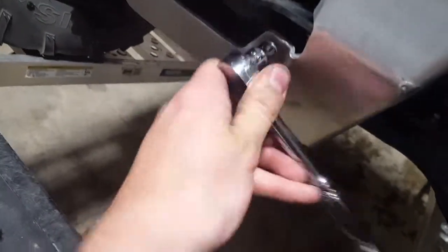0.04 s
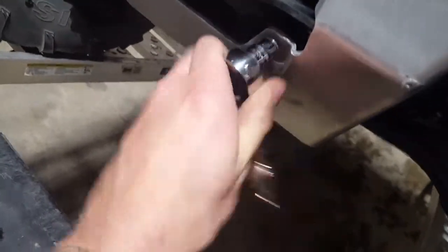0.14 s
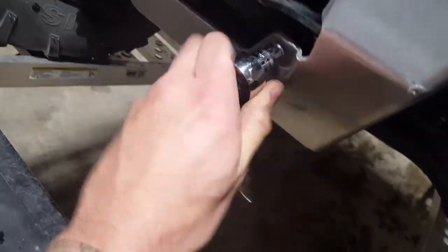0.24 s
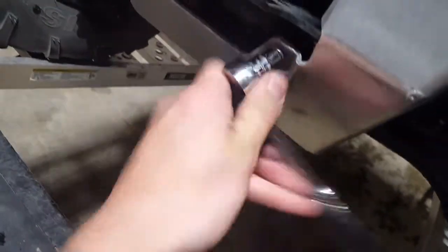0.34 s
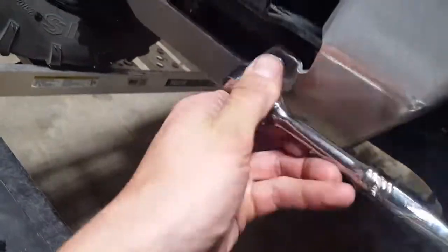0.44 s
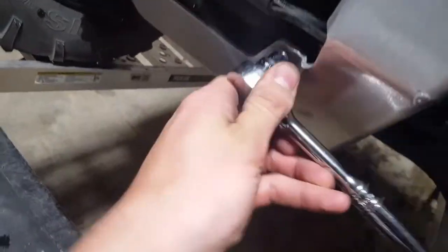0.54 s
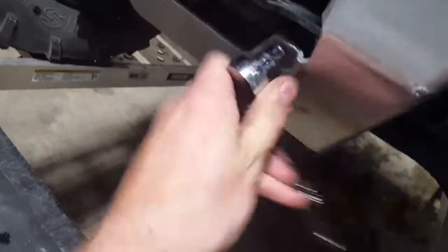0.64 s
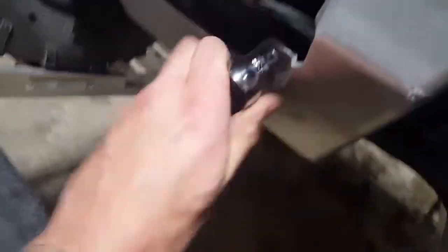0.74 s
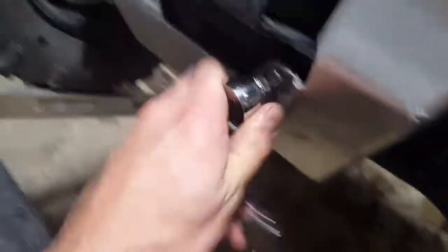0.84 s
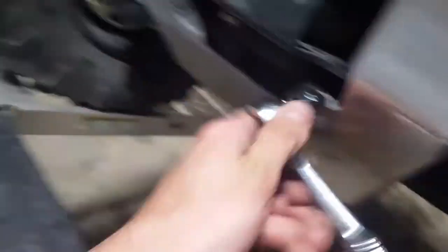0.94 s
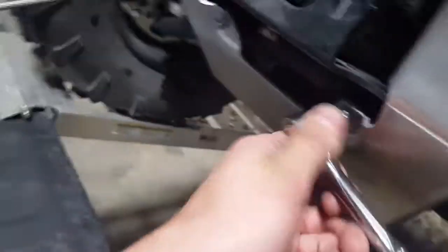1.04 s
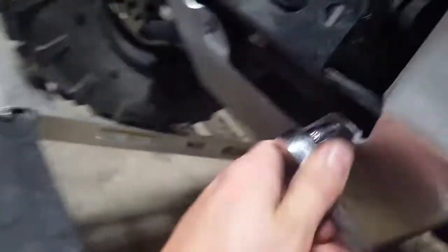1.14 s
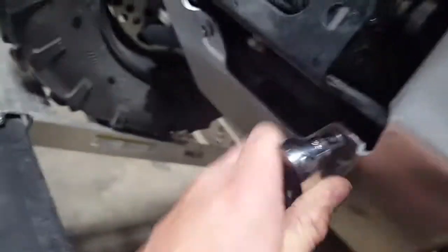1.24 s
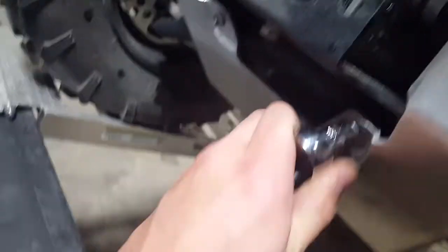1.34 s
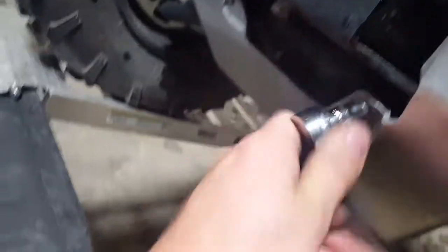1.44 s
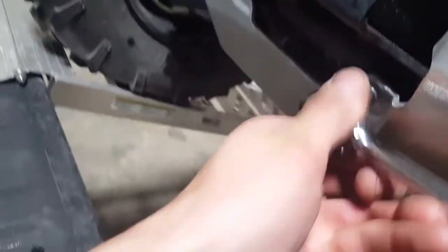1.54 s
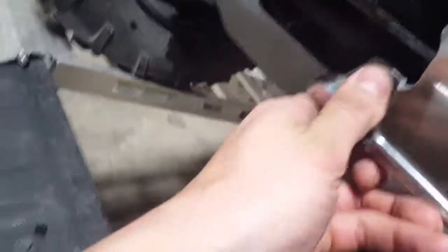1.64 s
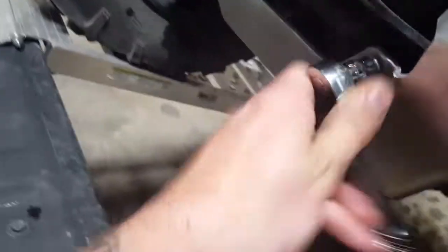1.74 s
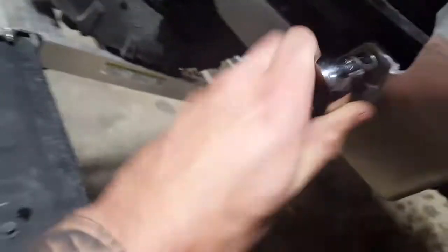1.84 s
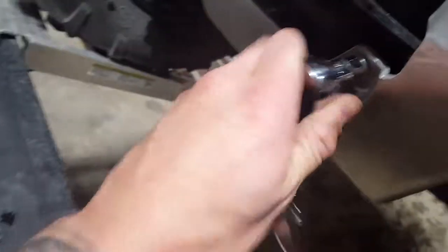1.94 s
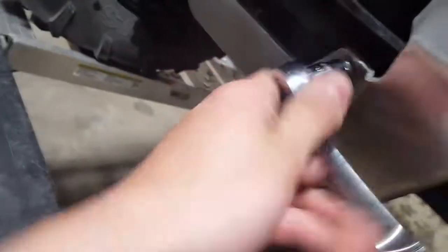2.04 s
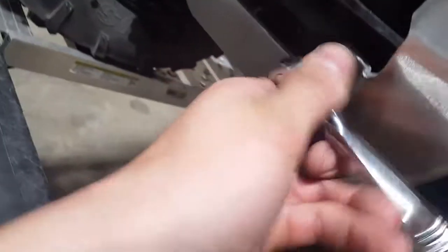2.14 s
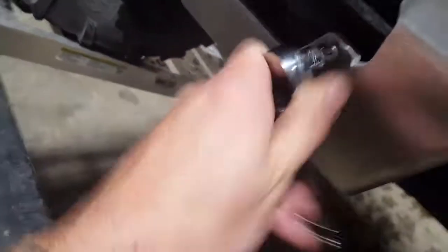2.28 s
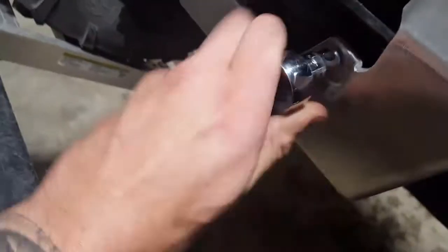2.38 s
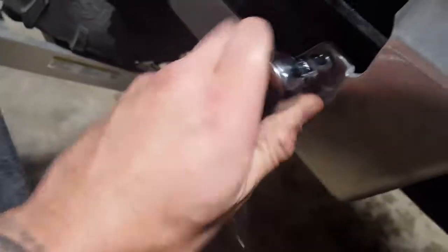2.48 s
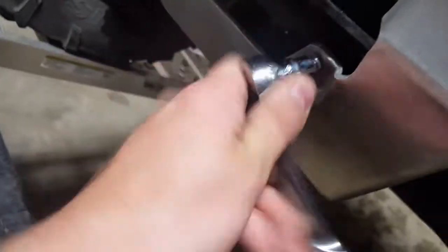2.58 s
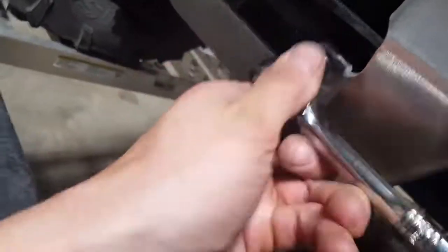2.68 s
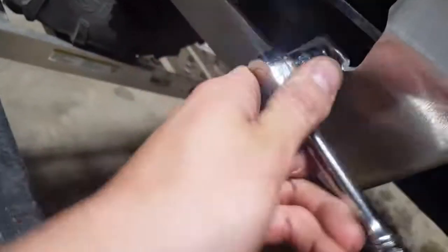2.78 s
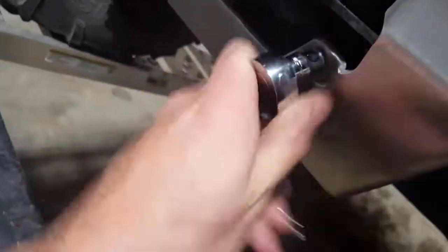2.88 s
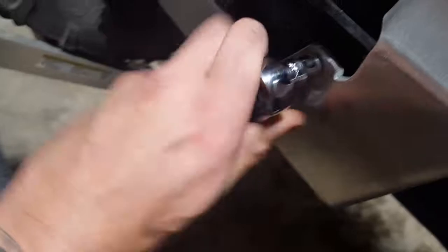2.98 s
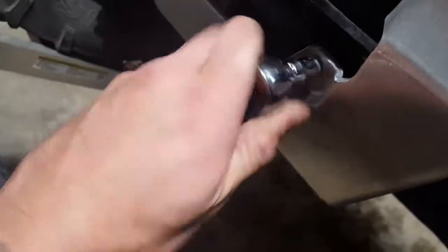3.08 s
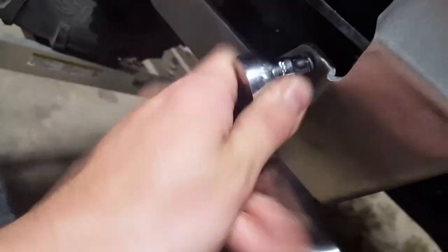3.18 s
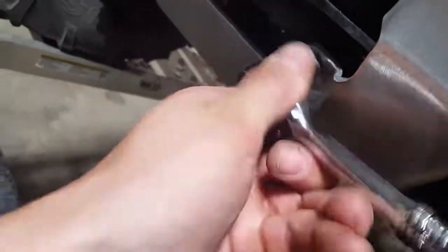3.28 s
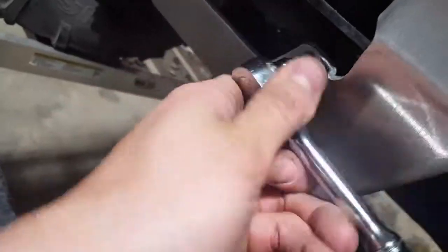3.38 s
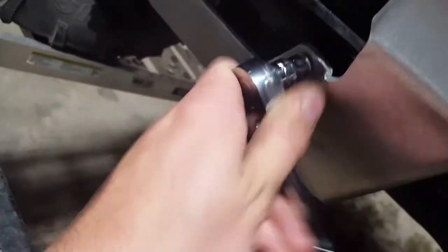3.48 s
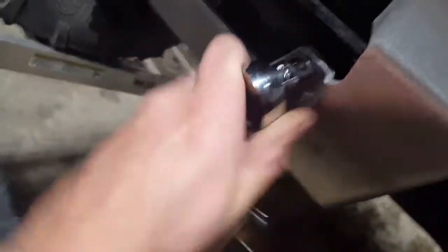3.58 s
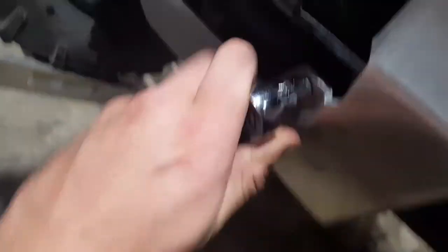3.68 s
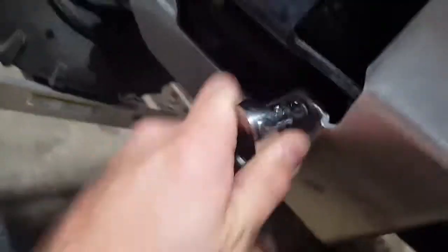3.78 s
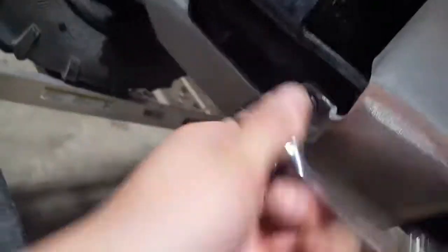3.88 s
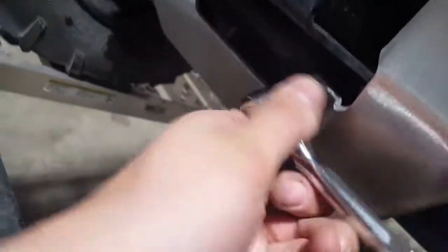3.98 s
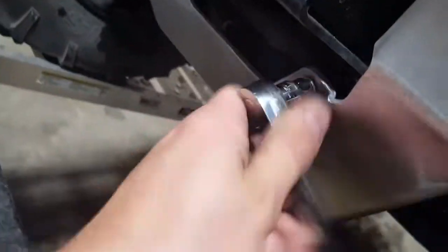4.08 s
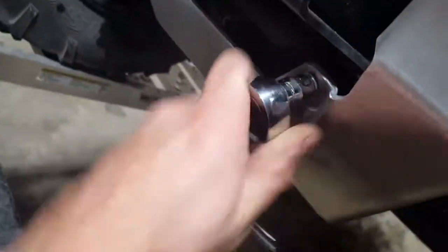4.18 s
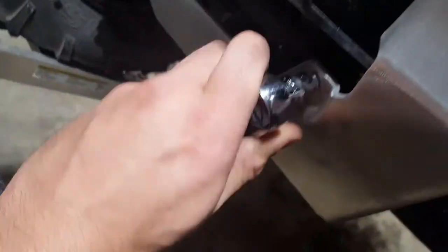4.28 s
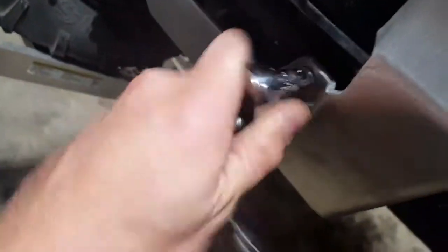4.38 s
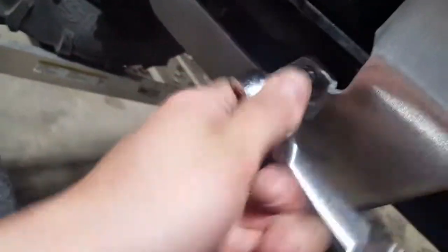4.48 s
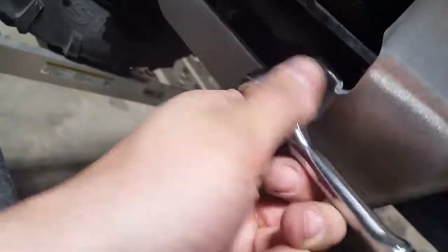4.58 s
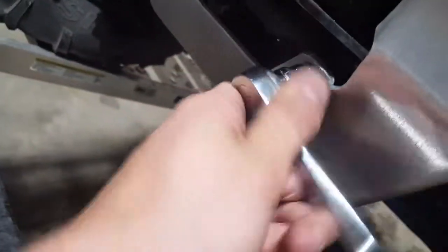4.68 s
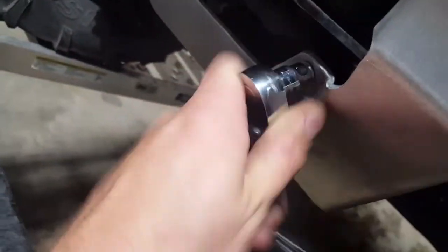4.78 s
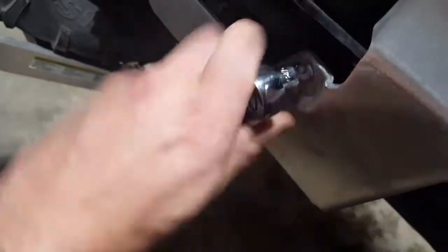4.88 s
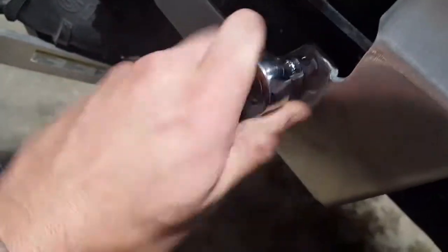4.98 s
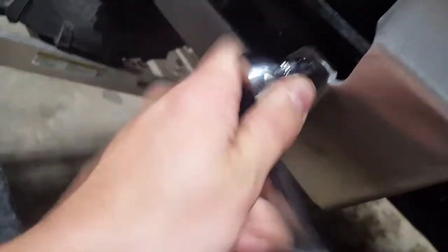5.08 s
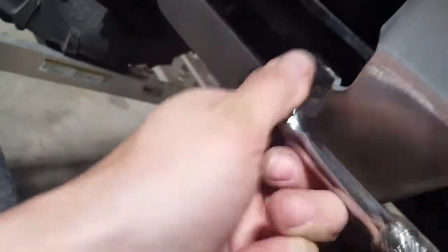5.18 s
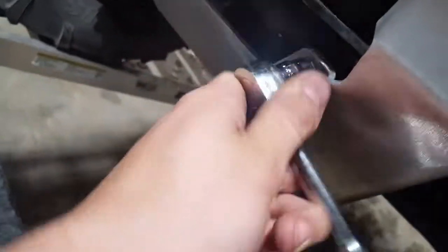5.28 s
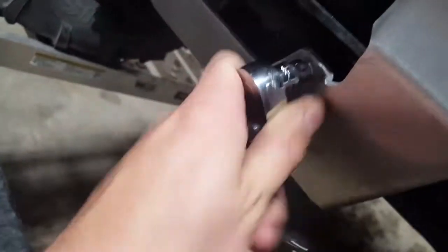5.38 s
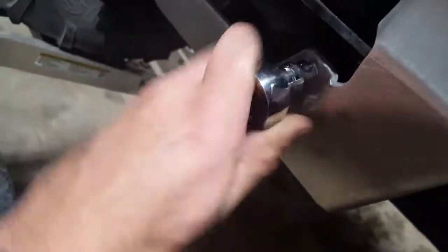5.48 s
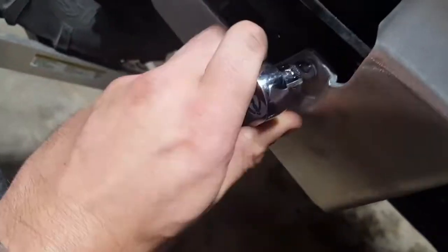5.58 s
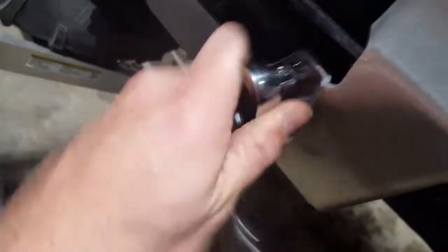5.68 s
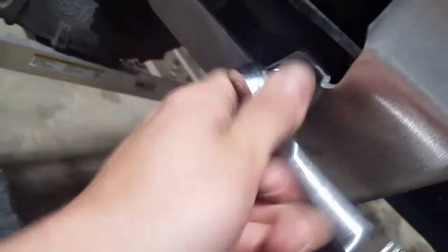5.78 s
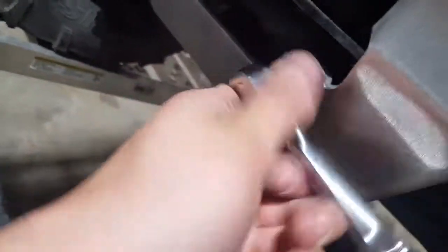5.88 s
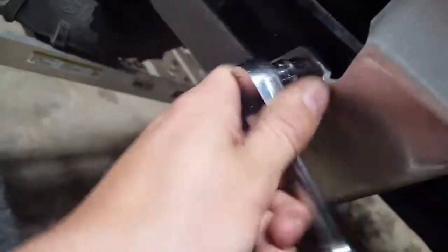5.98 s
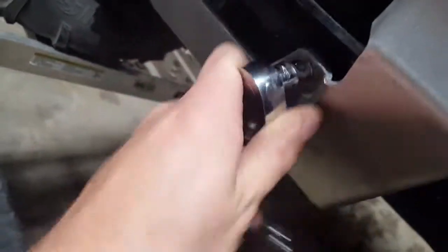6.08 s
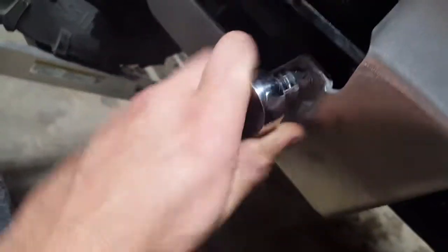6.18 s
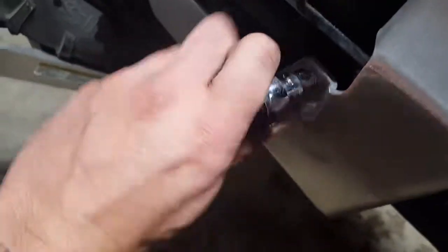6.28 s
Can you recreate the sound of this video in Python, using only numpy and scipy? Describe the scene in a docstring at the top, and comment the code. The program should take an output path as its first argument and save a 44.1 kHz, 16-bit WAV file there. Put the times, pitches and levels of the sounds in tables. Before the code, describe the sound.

A socket ratchet tightens a bolt on a steel plate under a vehicle. Each back swing gives a quick zip of bright metallic clicks, followed by a clunk as the socket seats and booms faintly in the chassis. The pattern repeats steadily, nearly twice a second, with an occasional soft rub of a hand on the handle. The microphone is close, with light garage reverberation and a faint drone behind.

```python
"""A quick metallic zip, then a clunk, over and over: a socket ratchet tightens a bolt under a vehicle.
On each back swing the pawl drops over the teeth, speeding up and slowing again; every impact rattles
the tool and excites the modes of a steel plate. The socket then takes up its slack with a clunk that
booms faintly in the chassis, and now and then the hand rubs along the handle. The microphones are
close; behind the tool lie the garage's reverberation, its steady noise and a faint drone."""
import sys
import numpy as np
from scipy import signal
from scipy.fft import rfft, irfft
from scipy.io import wavfile
from scipy.ndimage import uniform_filter1d

SR = 44100
rng = np.random.default_rng(int(sys.argv[2]) if len(sys.argv) > 2 else 0)


def digitize_waveform(pressure):
    """Quantize a signal to 16-bit integers and store it at the path in sys.argv[1].

    Rows of a 2-D input are taken as channels; values are limited to [-1, 1].
    """
    field = np.atleast_2d(pressure).T
    bounded = np.clip(field, -1, 1)
    quanta = np.round(bounded * 32767).astype(np.int16)
    wavfile.write(sys.argv[1], SR, quanta)


N = 279153


def amp(db):
    """Decibels to amplitude ratio."""
    return 10 ** (np.asarray(db) / 20)


def unit(x):
    """Normalisation to rms 1."""
    return x / np.sqrt(np.mean(x ** 2) + 1e-20)


def read(table, hz, column=1):
    """Interpolation of a table column on a log-frequency axis."""
    table = np.array(table)
    return np.interp(np.log(hz + 1), np.log(table[:, 0] + 1), table[:, column])


def add(mix, start_s, sound):
    """Superposition: a sound sums into the mix from start_s on."""
    part = mix[..., max(round(start_s * SR), 0):][..., :sound.shape[-1]]
    part += sound[..., :part.shape[-1]]


def bump(hz, centre_hz, width_hz):
    """Lorentzian resonance curve, 1 at its centre."""
    return 1 / (1 + (2 * (hz - centre_hz) / width_hz) ** 2)


def shelf(hz, edge_hz, order):
    """High-pass curve, from 0 below the edge to 1 above it."""
    return 1 - 1 / (1 + (hz / edge_hz) ** order)


def colour(x, gain_db, size=4096):
    """Minimum-phase filter whose gain in dB is a function of frequency."""
    hz = abs(np.fft.fftfreq(size, 1 / SR))
    log_response = np.conj(signal.hilbert(np.log(amp(gain_db(hz)))))
    taps = np.fft.ifft(np.exp(log_response)).real
    return signal.fftconvolve(x, taps[None], axes=1)[:, :x.shape[1]]


# likeness of the sound at the two microphones: frequency_hz, correlation
COHERENCE = [(30, 0.15), (100, 0.97), (600, 0.73), (1000, 0.1), (1800, 0.026), (14000, .02)]


def pair(noises):
    """Spatial coherence: two close microphones receive much the same bass but unrelated treble."""
    own, right = rfft(noises)
    same = read(COHERENCE, np.fft.rfftfreq(noises.shape[-1], 1 / SR))
    left = same * right + np.sqrt(1 - same ** 2) * own
    return irfft(np.array([left, right]), noises.shape[-1])


def scatter(size=2048):
    """Dense reflections: an even spectrum with random phases, in stereo."""
    phases = 2 * np.pi * rng.random((2, size // 2 + 1))
    return unit(pair(irfft(np.exp(1j * phases))))


def strike(pattern, db, treble_db, rise_ms, hold_ms, fade_ms, linger=0.17, linger_ms=14, cut_below_db=-2):
    """Impact: a metallic click rises, holds and fades; quieter clicks have their highest treble cut."""
    ms = np.arange(pattern.shape[-1]) / SR * 1000
    decay = np.exp(-np.maximum(ms - hold_ms, 0) / fade_ms) + linger * np.exp(-ms / linger_ms)
    envelope = (1 - np.exp(-ms / rise_ms)) * decay
    impulse = signal.unit_impulse(len(ms), np.searchsorted(ms, rise_ms))
    rattle = pattern * envelope / np.linalg.norm(envelope)
    hit = np.vstack([rattle, impulse])  # rows: left, right, and the blow that rings the modes
    top_db = np.clip(db + treble_db - cut_below_db, -18, 2)
    return colour(hit, lambda hz: treble_db * shelf(hz, edge_hz=3320, order=4)
                  + top_db * shelf(hz, edge_hz=9650, order=24) + db, size=256)


def contact_drift(spread_db, memory, teeth=36, bands=20):
    """Correlated drift: band gains in dB wander from tooth to tooth as the contact point moves."""
    steps = rng.standard_normal((teeth, bands))
    return spread_db * unit(signal.lfilter([1], [1, -memory], steps, axis=0))


# back swings of the handle; swell and brighten are changes over the swing, levels are relative:
# start_s, end_s, first_rate_hz, top_rate_hz, last_rate_hz, fastest_fraction, level_db, swell_db,
# treble_db, brighten_db, pawl_zing_hz, pawl_zing_db, plate_knock_db, socket_clank_db
BACK_SWINGS = [(.002, 0.058, 79, 115, 68, 0.45, -25.5, -1.5, -7, -7, 4500, -1, -5.5, -0.5),
               (0.427, 0.571, 88, 160, 79, 0.52, -27.5, -1, 0, 0.5, 4550, 3.5, -3.5, 4),
               (0.969, 1.13, 92.6, 146, 105, .32, -27, 0, -1.5, -1.5, 4800, 1.5, 0, 0),
               (1.535, 1.674, 88.5, 188, 92, 0.7, -22.5, -1, -0.5, -3, 6500, 1.5, -0.5, -1),
               (2.104, 2.237, 126, 142.6, 129, 0.47, -25, -1.5, 1.5, 2.5, 5300, -3.5, 1, 2),
               (2.635, 2.802, 110.5, 137, 81, 0.61, -24, -5.5, -2.5, 4, 6700, -1.5, -1.5, 2),
               (3.232, 3.411, 107, 167, 92, 0.62, -25.5, 1, -1, 7.5, 6230, 2.5, 1, 3),
               (3.878, 4.063, 73, 189, 82, 0.5, -23, -4.5, -3, 0.5, 6620, 6.5, -1.5, -0.5),
               (4.492, 4.66, 119, 174, 96, 0.73, -25, 0.5, .5, 5, 6600, 2, 2, 3.5),
               (5.115, 5.305, 100, 159, 101, .8, -23, 4.5, -1, -4.5, 6700, -1, 3.5, -0.5),
               (5.792, 5.956, 105.5, 177, 91, 0.75, -26, -2, 2, -0.5, 6400, 5.5, 5, -3)]


def pawl(alike=0.71, uneven_db=1.7, jitter_s=0.00012, ease_s=0.031, ease_db=-2):
    """Impact train: the pawl drops off tooth after tooth, brighter the faster it runs."""
    out = np.zeros((3, N))
    for start, end, first_hz, top_hz, last_hz, fastest, *tone in BACK_SWINGS:
        level_db, swell_db, treble_db, brighten_db, zing_hz, zing_db, knock_db, clank_db = tone
        t = np.arange(start, end, 1 / SR)
        progress = (t - start) / (end - start)
        rate_hz = np.interp(progress, [0, fastest, 1], [first_hz, top_hz, last_hz])
        teeth = np.flatnonzero(np.diff(np.floor(np.cumsum(rate_hz) / SR), prepend=-1))
        octaves = np.log2(rate_hz / rate_hz.mean())
        lean = progress - 0.5  # the hand's pressure shifts steadily
        easing = np.maximum(1 - (end - t) / ease_s, 0)  # and lets up at the end
        power_db = level_db + swell_db * lean + ease_db * easing
        energy_db = power_db + 10 * np.log10(SR / rate_hz)  # faster teeth each carry less
        bright_db = treble_db + brighten_db * lean + 3.5 * octaves
        bright_db[0] += 0.5  # the first tooth
        tints = contact_drift(spread_db=5, memory=0.88)
        bands_hz = np.linspace(0, 12000, tints.shape[1])
        fresh_patterns = [scatter() for _ in tints]
        chance = rng.standard_normal((len(tints), 2))
        pattern, run = scatter(), np.zeros((3, SR // 3))
        for i, fresh, (force, late), tint_db in zip(teeth, fresh_patterns, chance, tints):
            pattern = np.sqrt(alike) * pattern + np.sqrt(1 - alike) * fresh  # resembles the last click
            hit = strike(pattern, energy_db[i] + uneven_db * force, bright_db[i],
                         rise_ms=1.5, hold_ms=3.4, fade_ms=6.06, linger=0.13)
            ping_db = zing_db + 4 * octaves[i]
            rock_db = -0.07 * bright_db[i]  # a tooth that lands dull rocks the socket instead
            hit = colour(hit, lambda hz: np.interp(hz, bands_hz, tint_db) * shelf(hz, 746, order=4)
                         + ping_db * bump(hz, zing_hz, 1440) + rock_db * bump(hz, 1300, 600), size=256)
            add(run, i / SR + jitter_s * late, hit)
        run = colour(run, lambda hz: knock_db * bump(hz, 825, 330)
                     + clank_db * bump(hz, 1380, 640), size=1024)
        add(out, start, run)
    return out


# resonances of plate and tool: frequency_hz, bandwidth_hz, left_gain_db, right_gain_db, left_lead_rad
STEEL_MODES = [(484, 28, 6, 6, -.6), (613, 45, -6, 10, -.7), (815, 50, 7, 6, -.1), (880, 45, 6, 16, -.9),
               (1022, 45, 6, 10, .1), (1240, 40, -3, 7, 3), (1345, 55, 4, 16, .9), (1385, 40, 12, 8, 1.1),
               (1470, 50, -1, 9, -1.5), (1605, 58, 3, 14, .1), (1787, 40, 9, 18, 2.8), (2240, 54, 6, 1, .3),
               (2319, 24, 0, 7, -.6), (2530, 45, 3, 3, .1), (2675, 22, 5, 5, -1.5),
               (3122, 45, 14, 11, -1.3), (3567, 54, 9, -4, 2.1), (4120, 50, -3, 7, -2.9),
               (5620, 65, -1, 9, 3), (5784, 27, -6, 7, 1.1), (6345, 40, -6, 7, -1.2),
               (6448, 80, -6, 11, -3)]
# spectrum of the dense rattle between the modes: frequency_hz, left_gain_db, right_gain_db
RATTLE_SPECTRUM = [(56, -15, -15.5), (235, -7.5, -4), (523, -3, 2.5), (814, 7, 11), (1044, -13, 5.5),
                   (1360, -4.5, 11.5), (1860, 5.5, 7.5), (3640, 2, -1.5), (4160, 2, 9.5), (5300, -2, 7),
                   (6170, -3, 7.5), (8310, -7, 4), (9610, -17.5, -13), (14800, -24.5, -16.5)]


def steel(hits, ring_db, rattle_db):
    """Modal radiation: plate and tool answer each impact with damped sinusoids and a dense rattle."""
    t, ring = np.arange(SR // 4) / SR, 0
    for k, (mode_hz, width_hz, left_db, right_db, lead_rad) in enumerate(STEEL_MODES):
        decay = 2 * np.pi * width_hz / SR * np.exp(-np.pi * width_hz * t)
        phase = 2 * np.pi * mode_hz * t
        mode = np.array([amp(left_db) * np.sin(phase + lead_rad), amp(right_db) * np.sin(phase)])
        ring = ring + (-1) ** k * decay * mode
    bass_cut = signal.butter(2, 330, "high", fs=SR, output="sos")  # a small plate radiates little bass
    ringing = signal.oaconvolve(hits[2:], signal.sosfilt(bass_cut, ring), axes=1)[:, :N]
    left = colour(hits[:1], lambda hz: read(RATTLE_SPECTRUM, hz, column=1))
    right = colour(hits[1:2], lambda hz: read(RATTLE_SPECTRUM, hz, column=2))
    return amp(rattle_db) * np.vstack([left, right]) + amp(ring_db) * ringing


# reverberation of the garage: frequency_hz, t60_s, gain_db
GARAGE_DECAY = [(120, 0.97, 3), (403, 0.38, -7), (1000, 0.9, -11.5), (2860, 0.98, -12), (7400, 0.89, -23.5),
                (11700, 0.088, -20)]


def garage(x, build_s=0.0013):
    """Reverberation: a diffuse field decays exponentially, each band at its own rate."""
    hz, t, noise = signal.stft(pair(rng.standard_normal((2, SR))), SR, nperseg=256)
    decay = amp(-60 * t / read(GARAGE_DECAY, hz)[:, None]) * (1 - np.exp(-t / build_s))
    energy = SR * np.mean(decay ** 2, axis=1, keepdims=True)
    decay *= amp(read(GARAGE_DECAY, hz, column=2))[:, None] / np.sqrt(energy)
    response = signal.istft(noise * decay, SR, nperseg=256)[1]
    return signal.fftconvolve(x, response, axes=1)[:, :N]


def band_noise(low_hz, high_hz):
    """Band-limited stereo noise of rms 1."""
    band = signal.butter(2, [low_hz, high_hz], "band", fs=SR, output="sos")
    return unit(signal.sosfilt(band, pair(rng.standard_normal((2, N)))))


# spectrum of the garage's steady noise: frequency_hz, relative_density_db
AMBIENT_SPECTRUM = [(15, -37), (25, -5.5), (392, -5), (940, -9.5), (1100, -8), (1820, -8.5), (1970, -41),
                    (2570, -10.5), (2780, -35), (3530, -17.5), (14000, -52)]


def background(air_db=-50.5, drone_db=-58, waver_db=5.5, waver_s=0.345):
    """Ambient noise: a steady broadband floor and a narrow-band drone whose level wavers."""
    spectrum = amp(read(AMBIENT_SPECTRUM, np.fft.rfftfreq(N, 1 / SR)))
    air = irfft(rfft(pair(rng.standard_normal((2, N)))) * spectrum, N)
    steps = rng.uniform(-1, 1, size=64)
    waver = np.interp(np.arange(N) / SR / waver_s, np.arange(len(steps)), steps)
    drone = amp(drone_db + waver_db * waver) * band_noise(low_hz=358, high_hz=394)
    return amp(air_db) * unit(air) + drone


# stray teeth, and the tool rocking on the bolt or shifting in the hand: start_s, relative_db, treble_db
LOOSE_CONTACTS = [(.099, -15, -20), (.123, -20, -9), (.384, -25.5, -23), (.492, -6, -6), (.562, -7.5, -25),
                  (.723, -39, 10), (1.066, -4.5, -28), (1.473, -14.5, -24), (1.5, -17, -17),
                  (1.706, -10.5, -8.5), (2.596, -29.5, -8), (3.275, -9, -24), (3.468, -16.5, -32),
                  (3.489, -26, -20), (3.852, -16.5, -21), (3.878, -8, -11), (5.089, -27.5, -6),
                  (5.162, -15, 4), (5.757, -25.5, -14), (6.003, -16.5, -1)]


def clicks(gain_db=12, bright_db=3, last_tooth_s=0.0086, reverse_s=0.017):
    """Mechanical play: loose parts collide as the handle reverses, stops or shifts."""
    out, contacts = np.zeros((3, N)), list(LOOSE_CONTACTS)
    for start, end, _, _, _, _, level_db, *_ in BACK_SWINGS:
        contacts.append((end + last_tooth_s, level_db + 11.5, -4.5))  # one more tooth drops
        if start > reverse_s:
            contacts.append((start - reverse_s, -20.5, -17.5))  # the drive taps before the swing
    for start, db, treble_db in contacts:
        hit = strike(scatter(), db + gain_db, treble_db + bright_db,
                     rise_ms=2.17, hold_ms=2.5, fade_ms=11.5)
        add(out, start, hit)
    return out


# the socket takes up its slack: start_s, relative_db, relative_treble_db, chassis_boom_db
SOCKET_IMPACTS = [(0.139, -11, -22.5, -48.5), (0.649, -11.5, -26, -46), (1.212, -17, -34, -61),
                  (1.752, -16.5, -32, -44.5), (2.313, -11.5, -14, -43), (2.876, -18.5, -13.5, -44.5),
                  (3.5, -11.5, -22.5, -48.5), (4.11, -10, -24, -51), (4.721, -12, -24, -46),
                  (5.372, -13, -25, -42), (6.037, -8.5, -18.5, -45)]


def clunks(gain_db=14, knock_db=3, scuff_db=-12, scuff_lead_s=0.011):
    """Backlash: the socket scuffs the bolt head, then seats against it as the handle turns forward."""
    out = np.zeros((3, N))
    for start, relative_db, relative_treble_db, _ in SOCKET_IMPACTS:
        db = relative_db + gain_db
        treble_db = 0.53 * relative_treble_db + 3
        scuff = strike(scatter(), db + scuff_db, treble_db - 4, rise_ms=5.03, hold_ms=8.5, fade_ms=1.4)
        seat = strike(scatter(), db, treble_db,
                      rise_ms=2.3, hold_ms=1.4, fade_ms=3.1, linger=0.28, linger_ms=16)
        add(out, start - scuff_lead_s, scuff)
        add(out, start, seat)
    return colour(out, lambda hz: knock_db * bump(hz, centre_hz=910, width_hz=610), size=1024)


def chassis(rise_s=0.0026, fade_s=0.1):
    """Structure-borne sound: each clunk sets the heavy body panels booming."""
    envelope, t = np.zeros(N), np.arange(SR // 2) / SR
    for start, _, _, boom_db in SOCKET_IMPACTS:
        add(envelope, start, amp(boom_db) * (1 - np.exp(-t / rise_s)) * np.exp(-t / fade_s))
    panels = band_noise(low_hz=103, high_hz=174) + amp(-1.5) * band_noise(low_hz=174, high_hz=454)
    return envelope * panels


# the hand slides over the handle: start_s, end_s, level_db
HAND_SLIDES = [(0.177, 0.358, -54.5), (0.7, 0.9, -60), (1.258, 1.447, -66), (5.52, 5.724, -68)]


def hand(grain_db=3):
    """Friction noise: skin rubs on the chrome in short, grainy slides."""
    t = np.arange(N) / SR
    slides = sum(amp(db) * np.sin(np.pi * np.clip((t - start) / (end - start), 0, 1))
                 for start, end, db in HAND_SLIDES)
    grain = amp(grain_db * unit(uniform_filter1d(rng.standard_normal(N), 150)))
    return slides * grain * band_noise(low_hz=2500, high_hz=6600)


def scene():
    """Direct and reverberant fields add; the walls get less of the ringing than the close microphones."""
    hits = pawl() + clicks() + clunks()
    direct = steel(hits, ring_db=1, rattle_db=-0.5)
    to_walls = steel(hits, ring_db=-2.5, rattle_db=0.92)
    balance = amp([[-1.2], [1.1]])  # left, right
    return direct + garage(to_walls) + balance * (chassis() + hand() + background())


def record(dry, low_hz=50, high_hz=14650):
    """Band limiting: the microphones lose the deep bass and the recorder the highest treble."""
    thin = signal.sosfilt(signal.butter(2, low_hz, "high", fs=SR, output="sos"), dry)
    low_pass = signal.firwin(255, high_hz, window=("kaiser", 9), fs=SR)
    return signal.oaconvolve(thin, low_pass[None], "same")


dry = scene()
out = record(dry)
digitize_waveform(out)
```